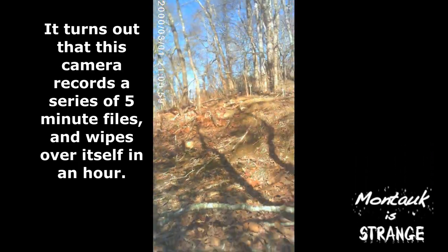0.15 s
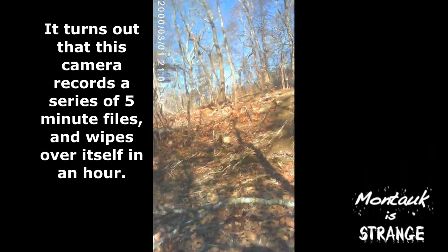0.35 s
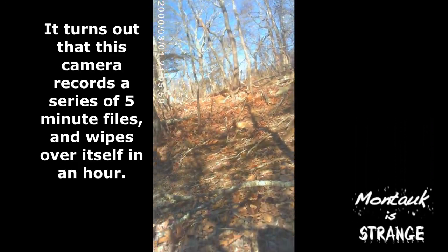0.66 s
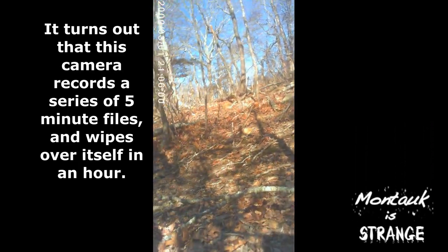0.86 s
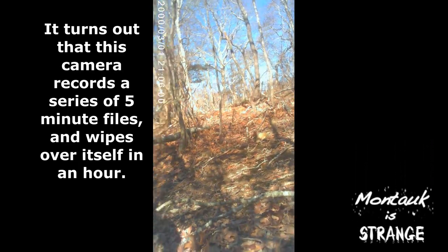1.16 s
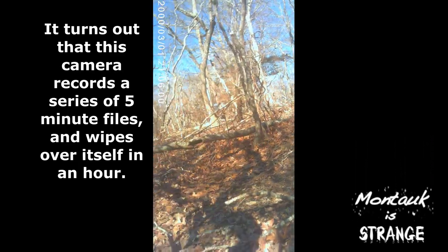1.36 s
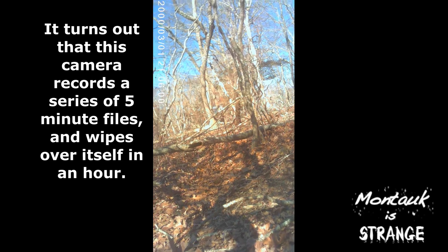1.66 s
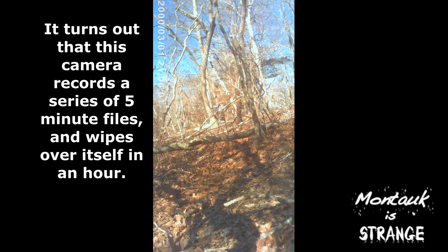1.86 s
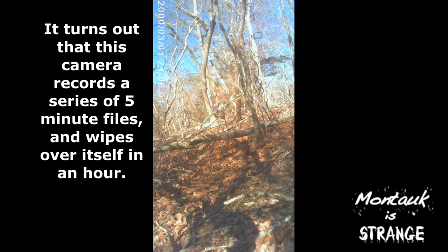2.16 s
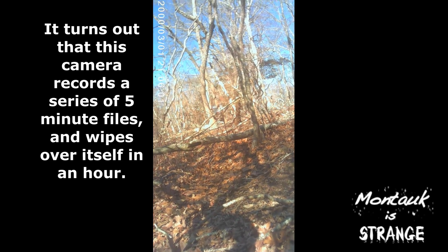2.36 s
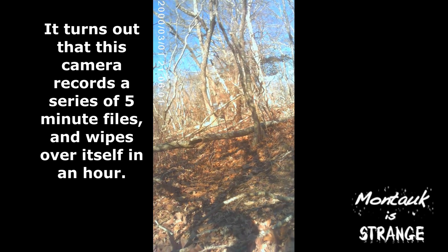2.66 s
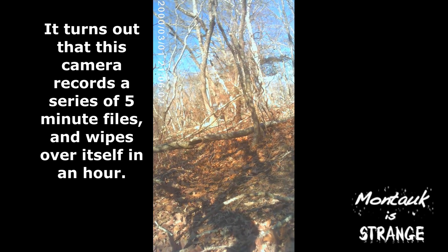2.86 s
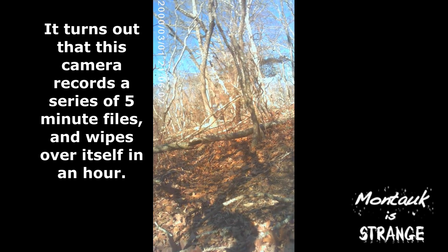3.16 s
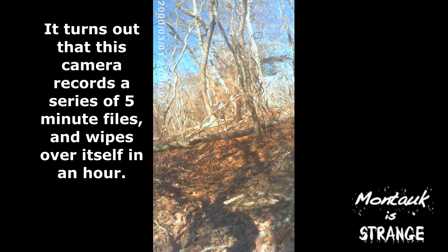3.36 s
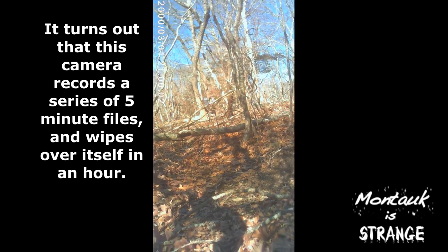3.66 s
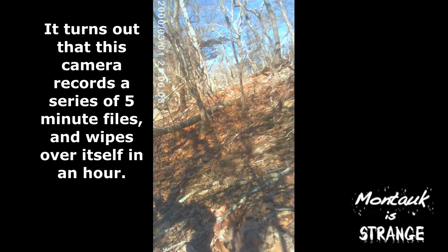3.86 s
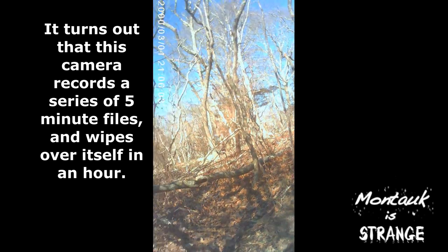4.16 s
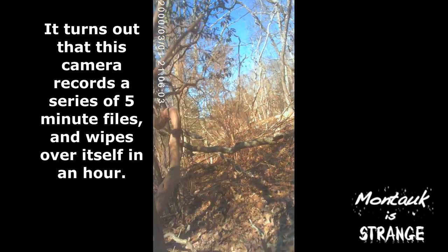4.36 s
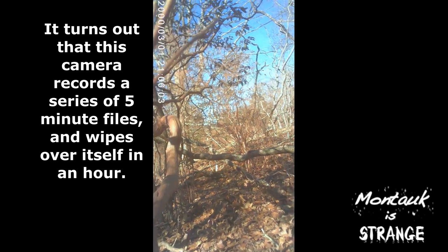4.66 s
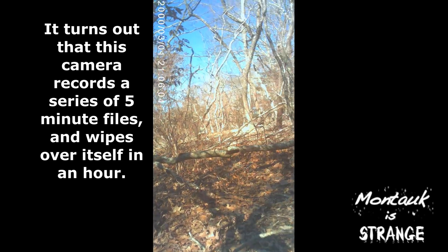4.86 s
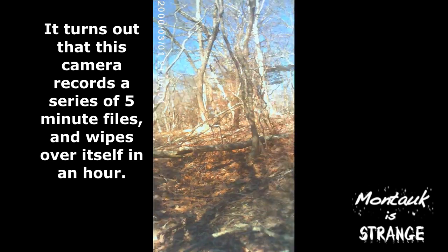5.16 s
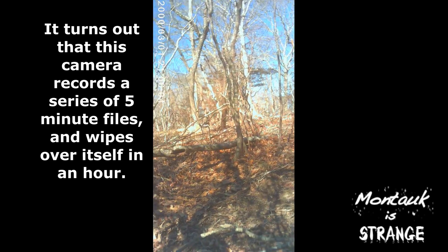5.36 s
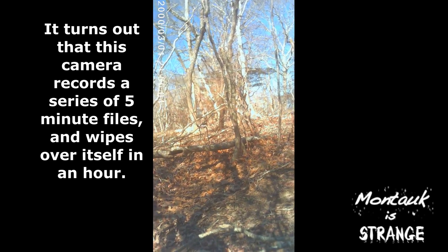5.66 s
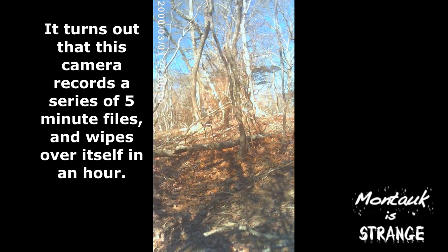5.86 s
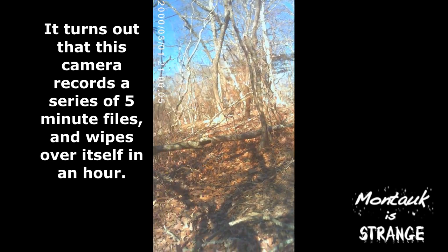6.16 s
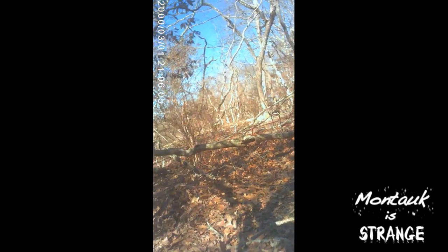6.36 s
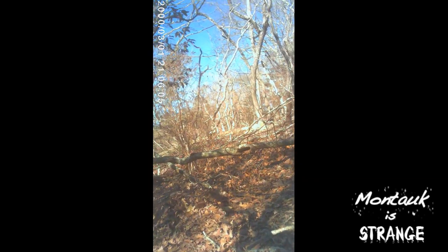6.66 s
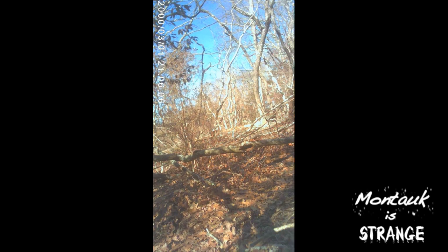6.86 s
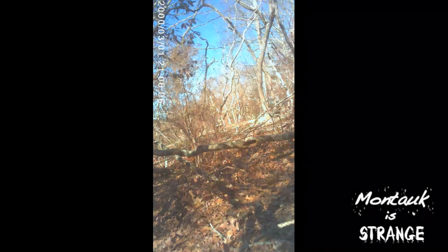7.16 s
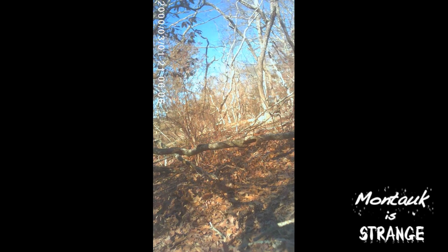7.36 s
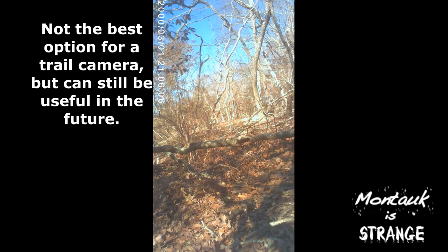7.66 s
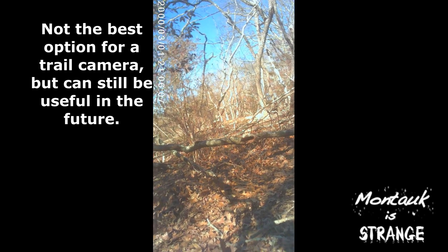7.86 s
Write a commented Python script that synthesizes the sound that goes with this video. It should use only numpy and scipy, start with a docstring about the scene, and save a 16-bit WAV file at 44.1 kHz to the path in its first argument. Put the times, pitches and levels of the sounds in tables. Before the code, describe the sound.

Dry leaves and twigs crackle against a carried plastic case; a loud scrape with hollow thumps gives way to soft cloth brushing.

```python
"""Sharp ticks, knocks and short rubs sound on a small plastic camera carried through dry leaves and brush.
Fingers and twigs strike the case and excite its resonances; leaves slide over it with friction noise.
One long scrape swells and booms as the camera is swung round, then a sleeve brushes softly past.
Beneath lie the rumble of the hand and a faint hiss. The microphone hears the contacts through the
resonant case, and only the band below 7 kHz is kept."""
import sys
import numpy as np
from scipy import signal
from scipy.fft import rfft, irfft, next_fast_len
from scipy.io import wavfile
from scipy.ndimage import uniform_filter1d, map_coordinates

SR = 44100
rng = np.random.default_rng(int(sys.argv[2]) if len(sys.argv) > 2 else 0)


def generate_wav(signal):
    """Clip the signal to [-1, 1] and save it as 16-bit WAV at the path in sys.argv[1]."""
    frames = np.transpose(np.atleast_2d(signal))
    scaled = np.clip(frames, -1, 1) * 32767
    pcm = np.round(scaled).astype(np.int16)
    wavfile.write(sys.argv[1], SR, pcm)


N = 353549
TREBLE_HZ, TOP_HZ = 4220, 7000

# The boom of the hollow case under the hard scrape. Each row: time in seconds, level in dB.
BOOM_LEVEL = [(3.9, -74.5), (3.96, -42), (3.99, -31.5), (4.03, -42), (4.06, -25), (4.11, -30.5),
              (4.135, -47.5), (4.2, -38), (4.25, -83)]


def amp(db):
    """Amplitude ratio of a level in decibels."""
    return 10 ** (np.asarray(db) / 20)


def unit(x):
    """Normalisation to an rms of 1."""
    return x / np.sqrt(np.mean(x ** 2) + 1e-20)


def add(out, start, sound):
    """Superposition: a sound is summed in from its start in seconds."""
    part = out[..., max(round(start * SR), 0):][..., :sound.shape[-1]]
    part += sound[..., :part.shape[-1]]


def curves(rows):
    """Linear interpolation over time: one value per sample for each column after the first."""
    times, *columns = np.transpose(rows)
    return [np.interp(np.arange(N) / SR, times, column) for column in columns]


def wobble(rate):
    """Band-limited fluctuation: a spline through `rate` random values a second."""
    knots = rng.standard_normal(int(N * rate / SR) + 4)
    return map_coordinates(knots, [np.arange(N) * rate / SR])


def filtered(x, response):
    """Linear filtering: the spectrum is multiplied by a frequency response."""
    size = next_fast_len(len(x) + 4096)
    return irfft(rfft(x, size) * response(np.fft.rfftfreq(size, 1 / SR)), size)[:len(x)]


def coloured(x, spectrum):
    """Spectral shaping by (Hz, dB) points joined on a logarithmic frequency axis."""
    points_hz, db = np.transpose(spectrum)
    return filtered(x, lambda hz: amp(np.interp(np.log(hz + 1), np.log(points_hz + 1), db)))


def band(x, low_hz, high_hz):
    """Causal Butterworth band-pass filtering."""
    return signal.sosfilt(signal.butter(3, [low_hz, high_hz], "band", fs=SR, output="sos"), x)


def registers(x, split_hz):
    """Division into low, middle and high bands: a rub's body, rasp and hiss, a hit's knock, crack, snap."""
    return band(x, 50, split_hz), band(x, split_hz, TREBLE_HZ), band(x, TREBLE_HZ, TOP_HZ)


def resonances(modes, hz):
    """Modal summation: damped (Hz, bandwidth in Hz, dB) resonators of alternating sign."""
    return sum((-1) ** k * amp(db) * 1j * hz * width / (centre ** 2 - hz ** 2 + 1j * hz * width)
               for k, (centre, width, db) in enumerate(modes))


def air(level_db=-68):
    """Stationary noise: quiet woodland and the microphone's own hiss."""
    # Each row: frequency in Hz, relative spectral density in dB.
    spectrum = [(22, 7.5), (60, -1), (250, 2), (700, -14), (1800, -8), (3000, -7), (4800, -12.5),
                (7000, -21)]
    return amp(level_db) * unit(coloured(rng.standard_normal(N), spectrum))


def rumble(body_gain, grip_db=-3, shake_db=-11.5):
    """Structure-borne noise: the hand thuds through the case, and firm strokes add their power."""
    # Each row: time in seconds, level of the hand's rumble in dB relative to grip_db.
    grip = [(0, -61.5), (0.7, -56.5), (0.85, -70), (1.15, -55), (1.4, -59), (1.9, -79), (3.15, -76.5),
            (3.3, -59.5), (3.55, -64), (3.7, -65), (4.3, -52), (4.55, -75.5), (5.8, -75.5), (6.35, -65.5),
            (6.75, -84), (7.05, -68), (7.6, -67.5), (8.02, -55.5)]
    thuds = band(rng.standard_normal(N), low_hz=46, high_hz=130) * amp(1.6 * wobble(5.3))
    return np.hypot(amp(curves(grip)[0] + grip_db), amp(shake_db) * body_gain) * unit(thuds)


def taps(attack_s=0.0028, blur_rad=0.64, scuff_db=2, scuff_t60=0.036):
    """Damped modes: a soft tap gives a short hollow ring and a scuff of noise."""
    # Each row: start in seconds, level in dB, pitch in Hz.
    soft_taps = [(4.971, -41.5, 1020), (5.146, -44.5, 1080)]
    # Each row: multiple of the pitch, relative level in dB, time to fall 60 dB in seconds.
    modes = [(0.234, -11, 0.21), (.88, -12, .09), (1, -7.5, .1), (2.02, -1.5, 0.035)]
    out, t = np.zeros(N), np.arange(SR // 4) / SR
    for start, db, pitch_hz in soft_taps:
        ring = 0
        for ratio, mode_db, t60 in modes:
            phase = 2 * np.pi * ratio * pitch_hz * t + blur_rad * wobble(463)[:len(t)]
            ring += amp(mode_db - 60 * t / t60) * np.sin(phase)
        scuff = amp(scuff_db - 60 * t / scuff_t60) * unit(band(rng.standard_normal(len(t)), 3260, 5040))
        add(out, start, amp(db) * (ring + scuff) * (1 - np.exp(-t / attack_s)))
    return out


def thumps(t60=0.064, attack_s=0.0018):
    """A damped mass on a spring: the camera bounces in the hand as the grip closes."""
    # Each row: start in seconds, level in dB, pitch in Hz.
    bounces = [(1.136, -25.5, 90), (4.077, -15, 98), (4.11, -17.5, 97), (4.308, -27.5, 113)]
    out, t = np.zeros(N), np.arange(SR // 8) / SR
    for start, db, pitch_hz in bounces:
        envelope = amp(db - 60 * t / t60) * (1 - np.exp(-t / attack_s))
        add(out, start, envelope * np.sin(2 * np.pi * pitch_hz * t))
    return out


def twigs(t60=0.011, blur_rad=0.5):
    """Free vibration after fracture: a twig rings for milliseconds at an unsteady pitch."""
    # Each row: start in seconds, level in dB, pitch in Hz.
    breaks = [(0.136, -18.5, 2270), (0.308, -2, 2595)]
    out, t = np.zeros(N), np.arange(SR // 20) / SR
    for start, db, pitch_hz in breaks:
        phase = 2 * np.pi * pitch_hz * t + blur_rad * wobble(1500)[:len(t)]
        add(out, start, amp(db - 60 * t / t60) * np.sin(phase))
    return out


def litter_ticks(per_second=11, scatter_db=2.5, knock_db=-9.5, snap_db=-10):
    """A random point process: settling leaves and twigs give faint impacts, as rows for contacts()."""
    # Each row: time in seconds, typical crack level in dB.
    typical_crack = [(0, -38), (0.28, -53), (0.5, -45), (0.85, -51), (1.1, -44.5), (1.5, -40),
                     (1.85, -49.5), (2.3, -53.5), (2.68, -62), (2.9, -57), (3.3, -53), (3.6, -44.5),
                     (4.4, -42), (4.8, -61), (6.0, -61), (7.3, -50), (7.8, -59)]
    levels = [0, knock_db, snap_db] + scatter_db * rng.standard_normal((200, 3))
    starts = np.cumsum(rng.gamma(2, size=len(levels))) / (2 * per_second)
    levels[:, 0] += np.interp(starts, *np.transpose(typical_crack))
    return np.column_stack([starts, levels])[starts < N / SR]


def contacts(crunch=0.11, usual_t60=0.0125, usual_db=-38, tail_db=-27, tail_t60=0.086, heavy_db=-24):
    """Impact excitation: a sharp push and a brief crunch from a finger or twig ring the case's modes."""
    # Each row: start in seconds, crack level in dB, low knock and treble snap in dB relative to it.
    impacts = [(0.007, -28, -9, 2), (0.015, -52, -1, -13), (0.0267, -37, -4.5, -1.5),
               (0.0854, -37.5, -12, 0.5), (0.0954, -37.5, -6, -1), (0.136, -19, -9, -9.5),
               (0.2011, -30.5, -10, -8), (0.245, -32.5, -11, 0.5), (0.3078, -16, -14, -8.5),
               (0.3135, -33, -1.5, 8.5), (0.3498, -22, -12.5, -3.5), (0.3568, -32, -24, 1),
               (0.371, -27, -20, -16), (0.457, -36, -14, 2), (0.489, -31.5, -29, -6.5),
               (0.5325, -29.5, -32, 2), (0.7015, -34, -12, -3), (0.729, -41.5, -7, -31),
               (0.9312, -37.5, -5.5, 2), (0.946, -48, -19, -7), (0.9616, -48, -4, 0.5),
               (1.0267, -44, 4, -9), (1.0741, -27.5, -12, -9.5), (1.1032, -26, -25, -21),
               (1.1357, -22.5, -4, -4.5), (1.1476, -28.5, -5.5, 2.5), (1.1723, -47, -1, 9),
               (1.178, -35.5, -6.5, -19), (1.2078, -31.5, -13, -4), (1.2719, -13, -0.5, -6),
               (1.2744, -13, -21, -2), (1.3247, -35, -8, -0.5), (1.3533, -36, -7.5, -4),
               (1.3832, -38.5, -11, -4), (1.3996, -38, -1.5, -15), (1.4088, -34.5, -9, -4),
               (1.4658, -39, -4.5, -12), (1.5017, -35.5, -9.5, -3.5), (1.5437, -35, -13, -14),
               (1.5677, -43, -8, -5), (1.597, -35.5, -14, -2.5), (1.6575, -38.5, -10.5, -2),
               (1.6658, -40, -10.5, 2), (1.7697, -37.5, -33, -3.5), (1.9302, -42.5, -22.5, -4),
               (1.9645, -45.5, -7.5, -10), (1.995, -44, -9, -1.5), (2.0828, -43.5, -25, -18),
               (2.107, -45, -7, -10), (2.1241, -42, -10.5, -7.5), (2.2106, -42, -15, -7),
               (2.3064, -48, -14.5, 4), (2.3825, -44, -7, -3.5), (2.528, -54, -4, -11.5),
               (2.6596, -55.5, -4, -16), (2.851, -44.5, -13, -20.5), (2.8563, -44, -10, -4.5),
               (2.8902, -46, -5.5, -19), (2.9714, -59.5, 4.5, 1), (3.2994, -43.5, -13, -2.5),
               (3.3515, -46.5, -5, -8), (3.475, -36.5, -5.5, -1.5), (3.4905, -35.5, -1, -7),
               (3.4985, -25.5, -6, 4.5), (3.5691, -37.5, -7, -3.5), (3.6037, -39.5, -6, -1),
               (3.702, -42, -9, -8), (3.7083, -42, -7, -6), (4.0425, -19, -7.5, -0.5), (4.078, -32, 6, 2),
               (4.0856, -21.5, -7, 7.5), (4.1185, -24.5, -1, 4), (4.2502, -27, -27, 0.5),
               (4.2608, -27, -13.5, -3), (4.2744, -31, -32, 4.5), (4.2803, -31.5, -29, -2),
               (4.304, -33, -9.5, -1), (4.3169, -33.5, -16, 0.5), (4.3269, -39, -21, 2.5),
               (4.39, -39, -7.5, -5.5), (4.414, -40, -13, -4.5), (4.4253, -32.5, -13.5, -8),
               (4.4986, -39, -19, -1.5), (4.6692, -43.5, -5.5, -8), (4.8414, -44.5, -12, -1),
               (5.2278, -41.5, -7.5, -15.5), (5.2388, -59, 6.5, 4), (5.2923, -34.5, -10, -4.5),
               (5.3603, -57.5, 8, -8), (6.0483, -39, -7.5, -3), (6.081, -56.5, 10.5, -3),
               (6.1727, -47.5, -22, -1.5), (6.2913, -48, -20, -14.5), (6.3454, -60, 7.5, 1),
               (6.42, -46, 2.5, -16.5), (6.4781, -41.5, -10, -7.5), (7.0877, -51.5, -28, -0.5),
               (7.1212, -40.5, -9, -3.5), (7.136, -46.5, -12, -6), (7.33, -48.5, -14, 6),
               (7.4176, -48.5, 2.5, -8), (7.4573, -39.5, -40, 7.5), (7.4903, -35, -13, -4),
               (7.6376, -54, -16, -5), (7.6597, -53, -23.5, -2), (7.684, -51, -17, -4),
               (7.7096, -49.5, -16, -5), (7.734, -56, -11.5, 0)]
    # Modes of the case. Each row: frequency in Hz, bandwidth in Hz, relative gain in dB.
    case_modes = [(131.8, 83, -2), (430, 320, -3.5), (990, 880, -7), (1370, 210, -3), (1580, 110, -4.5),
                  (2425, 540, -3.5), (2880, 300, 3.5), (3523, 510, -1.5), (4380, 290, -6.5),
                  (5300, 590, -7.5), (6250, 340, -7), (6650, 380, -6)]
    # Modes of the shell flexing under a heavy knock, with the same columns.
    flex_modes = [(806, 300, -6.5), (1430, 100, -8)]
    out, t = np.zeros(N), np.arange(2048) / SR
    starts, crack_db, low_db, high_db = np.vstack([impacts, litter_ticks()]).T
    knock_db, snap_db = crack_db + low_db, crack_db + high_db
    t60 = usual_t60 * 2 ** ((crack_db - usual_db) / 34)  # 34 dB harder crunches twice as long
    decay = amp(-60 * t / t60[:, None]) + amp(tail_db - 60 * t / tail_t60)
    force = crunch * decay * rng.standard_normal(decay.shape)
    force[:, 0] += 1  # the push
    hz = np.fft.rfftfreq(2 * len(t), 1 / SR)
    # Each spot on the case favours other modes.
    shell = sum(amp(rng.normal(0, 1.0, (len(starts), 1))) * (-1) ** k * resonances([mode], hz)
                for k, mode in enumerate(case_modes))
    shell += amp(knock_db - heavy_db)[:, None] * resonances(flex_modes, hz)
    rings = irfft(rfft(force, 2 * len(t)) * shell)[:, :len(t)]
    hits, onset = 0, t < 0.004
    # Each band takes its level over the onset, the crack lowered by 1 dB.
    for part, db in zip(registers(rings, split_hz=1940), (knock_db, crack_db - 1, snap_db)):
        hits += part * (amp(db) / part[:, onset].std(axis=1))[:, None]
    for start, hit in zip(starts, hits):
        add(out, start, hit)
    return out


def stroke(length_s, swell_db, attack_s, t60):
    """Amplitude envelope of a stroke: it takes hold, swells or fades evenly, and decays on release."""
    t = np.arange(int((length_s + 2 * t60) * SR)) / SR
    held_db = swell_db * (np.minimum(t / length_s, 1) - 0.5)
    release_db = -60 * np.maximum(t - length_s, 0) / t60
    return amp(held_db + release_db) * (1 - np.exp(-(t / attack_s) ** 2))


def squeaks(blur_rad=0.92):
    """Stick-slip oscillation: the sliding contact locks briefly on to a resonance of the case."""
    # Each row: start in seconds, length in seconds, level in dB, pitch in Hz.
    catches = [(0.371, 0.004, -25, 2850), (0.678, 0.0096, -31, 2940), (1.101, 0.0066, -29, 2976),
               (4.168, 0.0091, -21.5, 3040), (4.741, 0.011, -50.5, 3000), (6.158, 0.014, -50.5, 2720)]
    out = np.zeros(N)
    for start, length_s, db, pitch_hz in catches:
        envelope = stroke(length_s, swell_db=0, attack_s=0.0022, t60=0.016)
        t = np.arange(len(envelope)) / SR
        phase = 2 * np.pi * pitch_hz * t + blur_rad * wobble(500)[:len(t)]
        add(out, start, amp(db) * envelope * np.sin(phase))
    return out


def sleeve_gains(body_db=-8.5):
    """Soft friction: envelopes of body, rasp and hiss for the sleeve and the carrying palm."""
    # Each row: start and length in seconds, rasp in dB, swell in dB, hiss in dB relative to the rasp.
    brushes = [(4.367, 0.2, -49.5, 1.5, -4.5), (4.624, 0.13, -59, -5, -6), (4.867, 0.038, -62, 4, -2.5),
               (5.198, 0.11, -62, 8, -7), (5.393, 0.034, -50.5, -8, -5), (5.484, 0.028, -49.5, -2, -10),
               (5.542, 0.17, -53, -10.5, -5), (5.808, 0.13, -66, -4.5, -6), (5.918, 0.095, -64.5, -4, 2.5),
               (6.008, 0.14, -60.5, -7, -2.5), (6.149, 0.015, -51.5, 0, -9),
               (6.233, 0.028, -61, -3.5, -4.5), (6.315, 0.019, -59.5, 5.5, -6),
               (6.441, 0.068, -63.5, -3, -5), (6.54, 0.075, -55.5, -3, -4), (6.661, 0.032, -56.5, 1, -4),
               (6.75, 0.12, -63, -1, -3.5), (6.911, 0.13, -59, -5, -2), (7.135, 0.19, -57, 12.5, -2),
               (7.356, 0.12, -56.5, 16, -2.5), (7.5, 0.12, -61, -4, -7), (7.717, 0.16, -70, -0.5, -0.5),
               (7.931, 0.061, -60, -13, -9.5)]
    # Low friction of the hand after the swing. Each row: time in seconds, level in dB.
    palm = [(4.3, -90), (4.45, -61.5), (4.85, -70.5), (5.25, -64), (5.85, -70.5), (7.2, -68), (8.0, -72)]
    gains = np.zeros((3, N))
    for start, length_s, rasp_db, swell_db, hiss_db in brushes:
        envelope = stroke(length_s, swell_db, attack_s=0.015, t60=0.14)
        add(gains, start, amp(rasp_db + np.array([[body_db], [0], [hiss_db]])) * envelope)
    gains[0] = np.hypot(gains[0], amp(curves(palm)[0]))
    return gains


def rub_gains():
    """Intermittent friction: envelopes of body, rasp and hiss as fingers and leaves rub the case."""
    # Each row: start and length in seconds, rasp and swell in dB, body and hiss in dB relative to rasp.
    rubs = [(0.0, 0.12, -45.5, -9, -12.5, -0.5), (0.122, 0.14, -40, -4.5, -12, -4),
            (0.309, 0.014, -32, -4, -6, -0.5), (0.338, 0.082, -40.5, -2, -9, -5.5),
            (0.434, 0.11, -44.5, -8, -8.5, -1.5), (0.543, 0.022, -43.5, 7, -13.5, 0.5),
            (0.587, 0.044, -44, -5, -14.5, -7), (0.636, 0.055, -42, 8, -14.5, 1.5),
            (0.73, 0.4, -69, -4, -15, -1.5), (1.036, 0.02, -42.5, 19.5, -12, -5.5),
            (1.057, 0.042, -36, 2, -6.5, -3), (1.13, 0.12, -53, 1.5, 2, -8.5),
            (1.256, 0.024, -25, -14, -7, -3), (1.292, 0.086, -44, 3, -3.5, -12),
            (1.39, 0.18, -50, 4.5, -11, 3), (1.687, 0.11, -58, -3, -7.5, -1),
            (1.816, 0.0083, -42.5, 5.5, -10.5, 0.5), (2.043, 0.36, -59, -5.5, -9, -2),
            (2.352, 0.051, -57, 16.5, -12, -0.5), (2.417, 0.3, -71.5, -19.5, -9.5, 1.5),
            (2.505, 0.03, -57.5, 1, -10, -11), (2.737, 0.69, -67.5, -3.5, -8, 1),
            (3.482, 0.031, -29, -2.5, -12, -2), (3.536, 0.27, -56, -18, -11.5, -4.5)]
    gains = np.zeros((3, N))
    for start, length_s, rasp_db, swell_db, body_db, hiss_db in rubs:
        envelope = stroke(length_s, swell_db, attack_s=0.008, t60=0.057)
        add(gains, start, amp(rasp_db + np.array([[body_db], [0], [hiss_db]])) * envelope)
    return gains


def swing_gains(fade_s=0.016):
    """Sustained friction: envelopes of body, rasp and hiss for the long scrape of the swing."""
    # Each row: time in seconds, rasp in dB, body and hiss in dB relative to the rasp.
    scrape = [(3.778, -76, 4, -11), (3.79, -42, -12, -8.5), (3.826, -30.5, -12.5, -5), (3.9, -31, -15.5, 1),
              (3.934, -22.5, -21.5, -6), (4.11, -25, -15, 0), (4.228, -32.5, -5, -6),
              (4.275, -48.5, -6, -6.5), (4.38, -53, -15, -4)]
    rasp_db, body_db, hiss_db = curves(scrape)
    t = np.arange(N) / SR
    touching = np.clip(np.minimum(t - scrape[0][0], scrape[-1][0] - t) / fade_s, 0, 1)
    return touching * amp([rasp_db + body_db, rasp_db, rasp_db + hiss_db])


def boom():
    """Cavity resonance: under the hardest pressure the contact judders and the hollow case answers."""
    # Each row: frequency in Hz, bandwidth in Hz, relative gain in dB.
    cavity_modes = [(89, 18, -3.5), (350, 70, 3), (580, 130, 5), (877, 90, 4)]
    judder = rng.standard_normal(N) * amp(2.5 * wobble(160))
    return amp(curves(BOOM_LEVEL)[0]) * unit(filtered(judder, lambda hz: resonances(cavity_modes, hz)))


def micro_slips(per_second=380, spread_db=6):
    """Shot noise: tiny random slips, mostly weak, come in clumps as fibres catch and let go."""
    strength = amp(spread_db * np.minimum(rng.exponential(size=N), 3))
    clumping = amp(3.8 * wobble(60))
    slipping = rng.random(N) < clumping * per_second / SR
    return unit(slipping * strength * rng.choice([-1, 1], N))


def sliding_noise(depth_db=3.5):
    """Modulated noise: the colour shifts as the contact point wanders, and the level flickers."""
    spectrogram = signal.stft(rng.standard_normal(N), nperseg=1024)[2]
    patches = uniform_filter1d(rng.standard_normal(spectrogram.shape), size=4, axis=0)
    patches = uniform_filter1d(patches, size=3, axis=1)
    noise = signal.istft(spectrogram * amp(depth_db * unit(patches)), nperseg=1024)[1][:N]
    return noise * amp(0.65 * wobble(40) + wobble(220))


def friction(rubs, swing, sleeve, easy_rub_db=-47.5, smoothing=0.09):
    """Friction noise: smooth sliding and dry crackle share the power of each stroke, band by band."""
    # Spectra of a firm stroke, the hard scrape, brushing cloth and dry crackle.
    # Each row: frequency in Hz, relative spectral density in dB before the bands are normalised.
    slide_spectrum = [(100, -9.5), (250, -7.5), (600, -14), (1030, -15.5), (1270, -4), (1520, -4.5),
                      (1900, -13), (2400, -1.5), (2850, 1), (3250, -3), (3650, -3), (4800, -8), (5550, -1),
                      (6900, -16)]
    scrape_spectrum = [(90, -7.5), (200, -16.5), (370, -6.5), (570, -9.5), (870, -2.5), (1100, -6.5),
                       (1650, -20.5), (2400, 3.5), (2900, 3.5), (3500, 4), (4000, 1.5), (4700, -6.5),
                       (5350, -0.5), (6900, -10.5)]
    cloth_spectrum = [(100, -6), (500, -9.5), (800, -20), (1000, -13), (1170, -6), (1400, -8.5),
                      (1800, -16.5), (2400, -9), (2700, -9), (3020, -0.5), (3350, -9.5), (4800, -13),
                      (5500, -6.5), (6900, -30)]
    crackle_spectrum = [(100, -2.5), (500, -7.5), (1000, -8.5), (1900, -5), (2600, 0), (3200, 4),
                        (4000, -3.5), (4900, -2), (5800, 1.5), (7000, -5.5)]

    def unit_bands(x, spectrum):
        """Spectral shaping into body, rasp and hiss, each at an rms of 1."""
        return np.array([unit(part) for part in registers(coloured(x, spectrum), split_hz=950)])

    noise = sliding_noise()
    crackle = unit_bands(micro_slips(), crackle_spectrum)
    slide = unit_bands(noise, slide_spectrum)
    cloth = unit_bands(noise, cloth_spectrum)
    hardness = np.clip((curves(BOOM_LEVEL)[0] + 52) / 8, 0, 1)  # the colour hardens as the case booms
    scrape = (1 - hardness) * slide + hardness * unit_bands(noise, scrape_spectrum)
    firmness_db = 20 * np.log10(np.maximum(rubs[1] / amp(easy_rub_db), 1))
    rub_grit_db = 1 - smoothing * firmness_db  # a firmer rub slides more smoothly
    out = np.zeros(N)
    for gains, smooth, grit_db in (rubs, slide, rub_grit_db), (swing, scrape, -8), (sleeve, cloth, -7):
        grit = amp(grit_db)
        out += (gains * (smooth + grit * crackle)).sum(axis=0) / np.hypot(1, grit)
    return out


def scene():
    """Superposition of impacts, friction and background at one microphone."""
    rubs, swing, sleeve = rub_gains(), swing_gains(), sleeve_gains()
    impacts = contacts() + twigs() + thumps() + taps()
    sliding = friction(rubs, swing, sleeve) + squeaks() + boom()
    return (impacts + sliding + rumble(body_gain=rubs[0] + swing[0]) + air())[None]


def record(dry):
    """Soft saturation rounds the hardest knocks; a steep low-pass rings briefly after sharp clicks."""
    ceiling = 0.62
    saturated = dry / (1 + np.abs(dry / ceiling) ** 4) ** (1 / 4)
    return signal.sosfilt(signal.cheby1(12, 0.3, TOP_HZ, fs=SR, output="sos"), saturated)


dry = scene()
out = record(dry)
generate_wav(out)
```